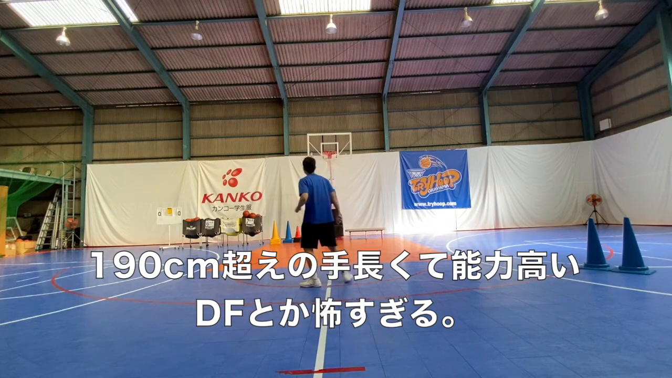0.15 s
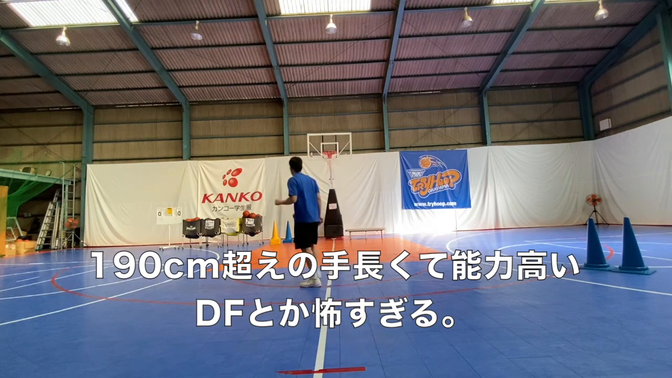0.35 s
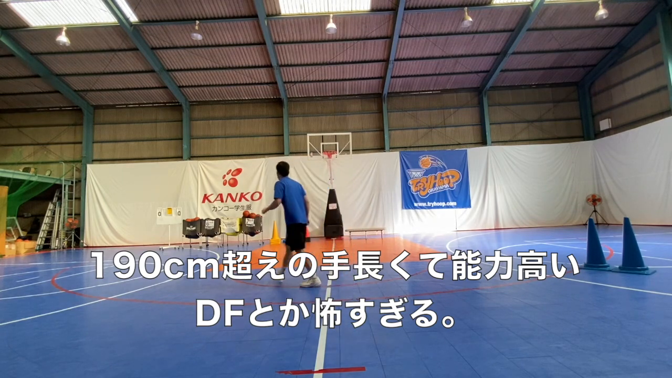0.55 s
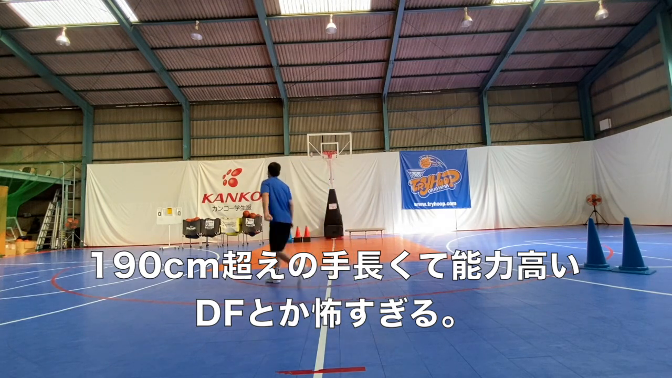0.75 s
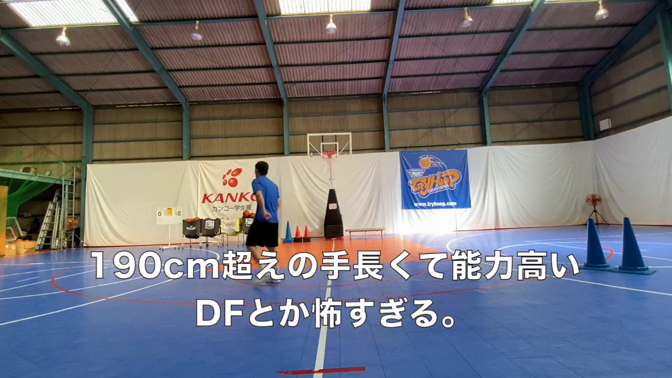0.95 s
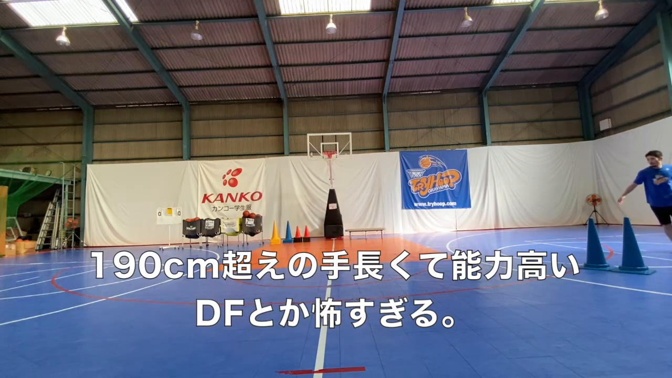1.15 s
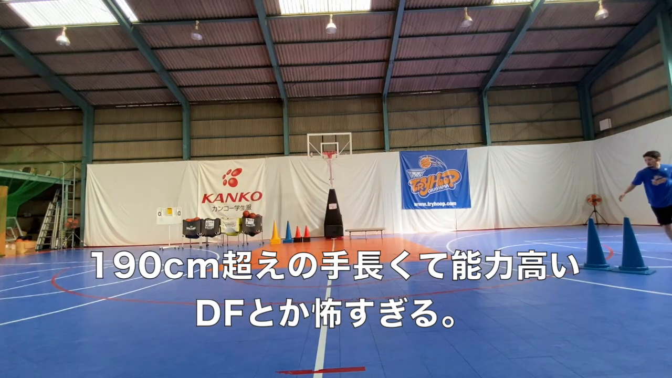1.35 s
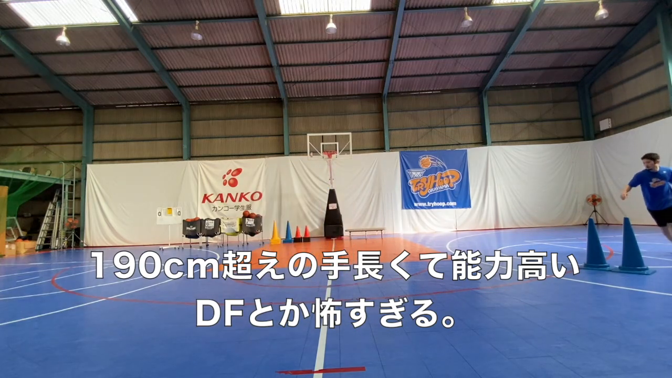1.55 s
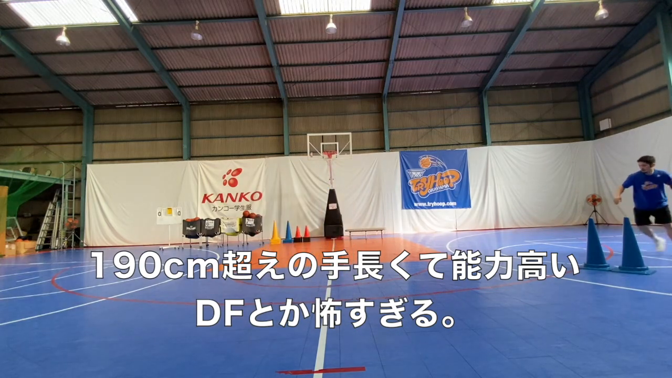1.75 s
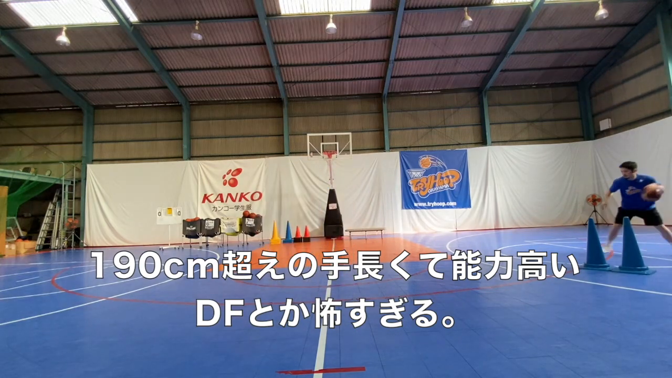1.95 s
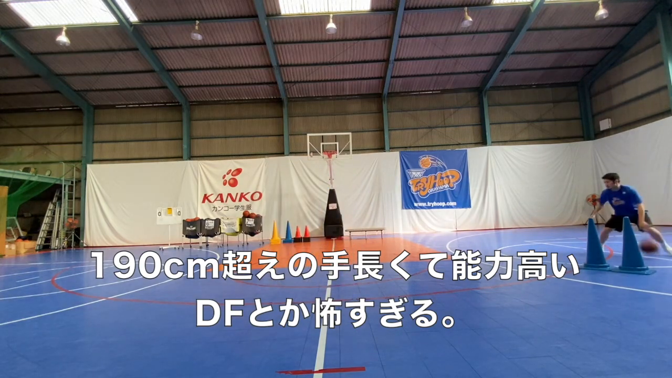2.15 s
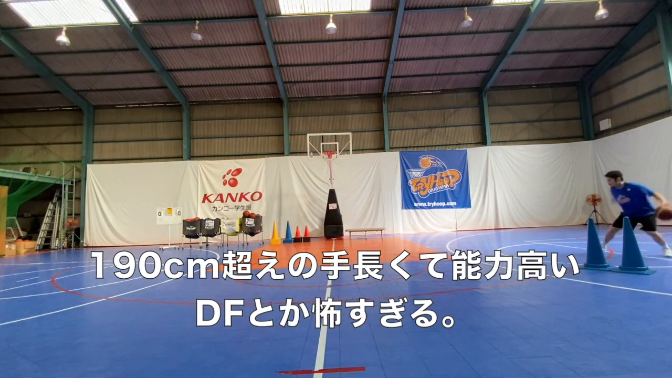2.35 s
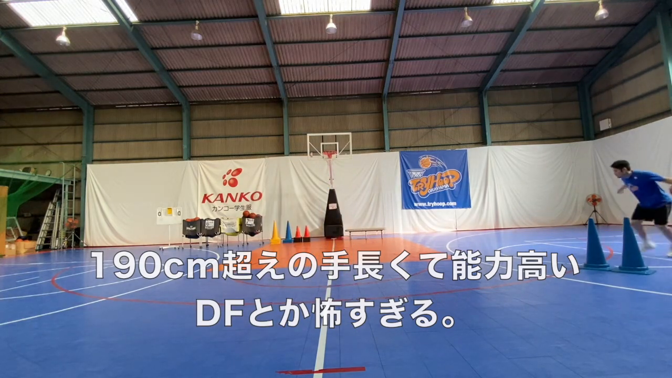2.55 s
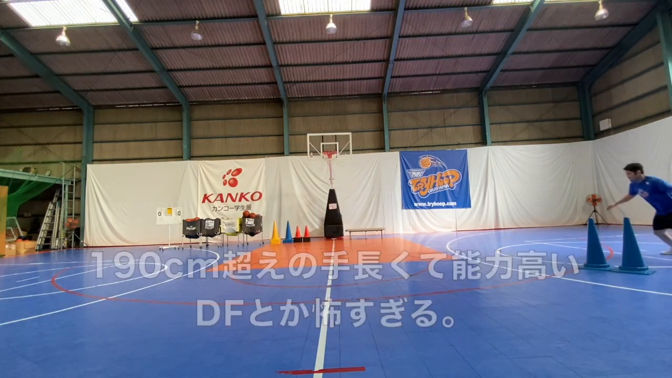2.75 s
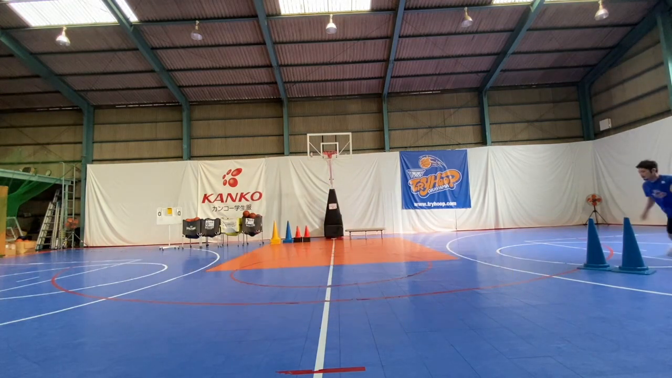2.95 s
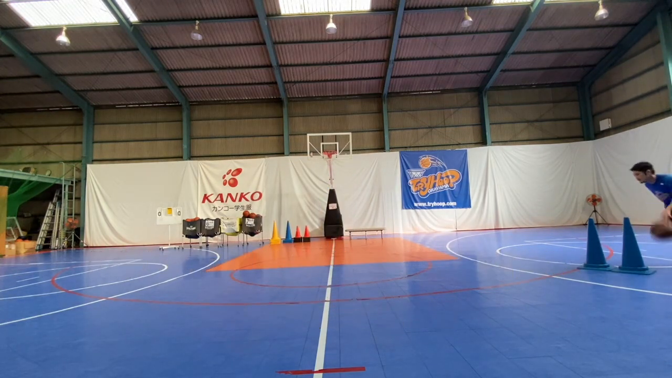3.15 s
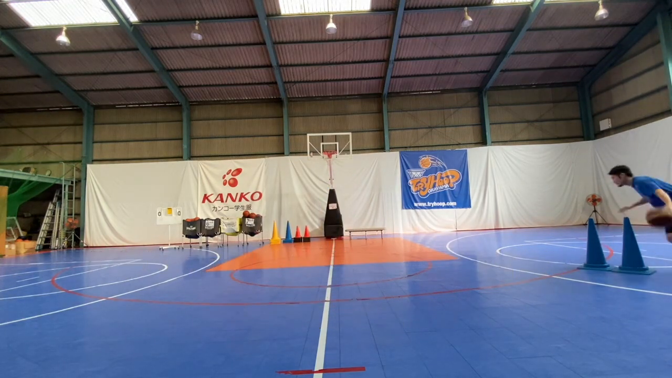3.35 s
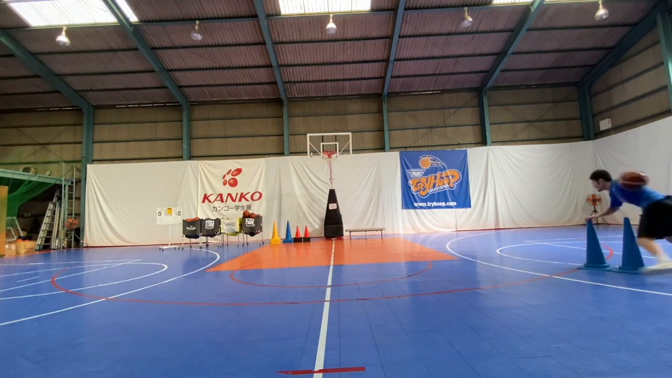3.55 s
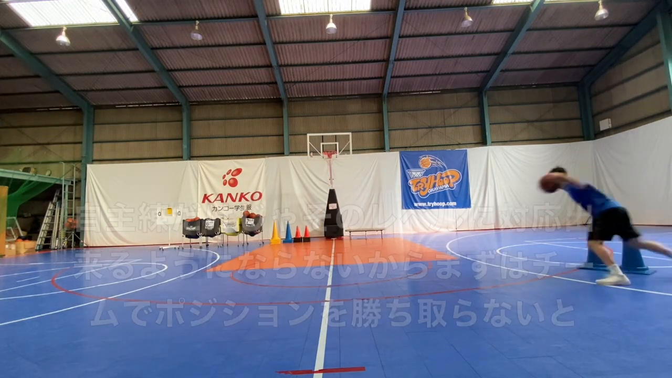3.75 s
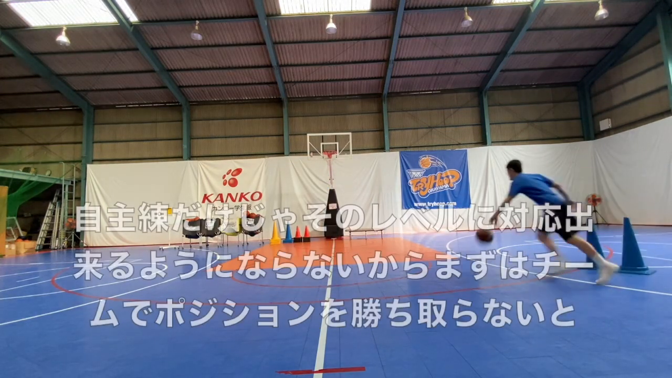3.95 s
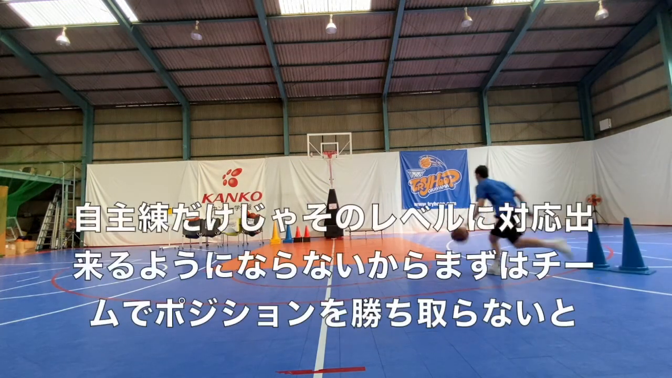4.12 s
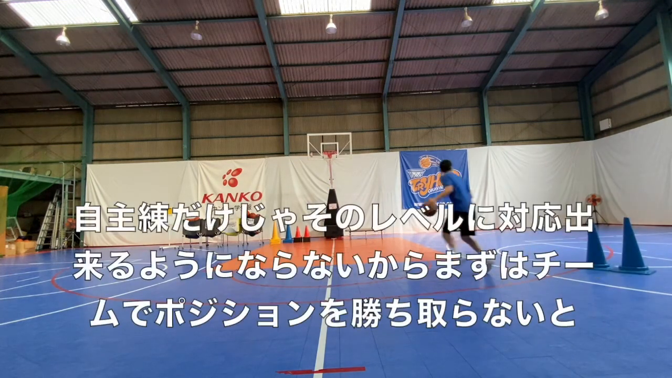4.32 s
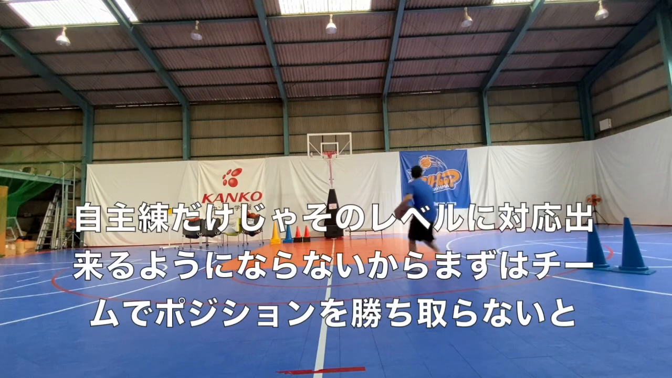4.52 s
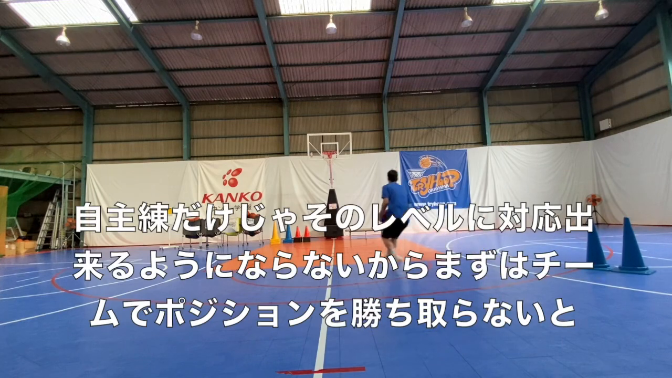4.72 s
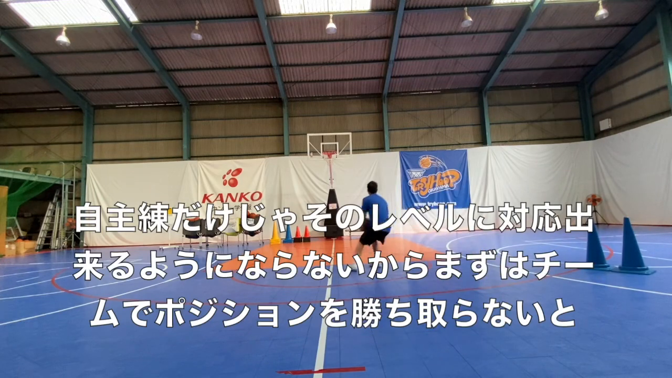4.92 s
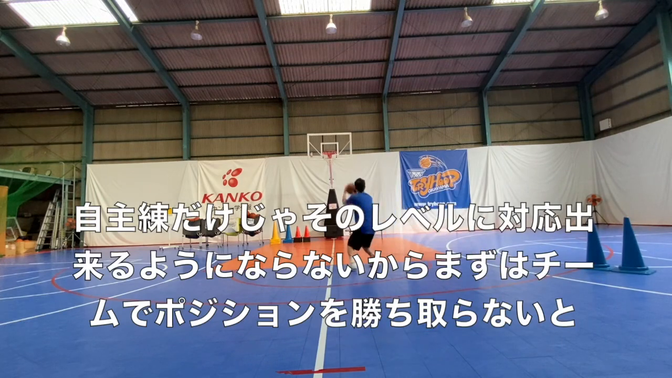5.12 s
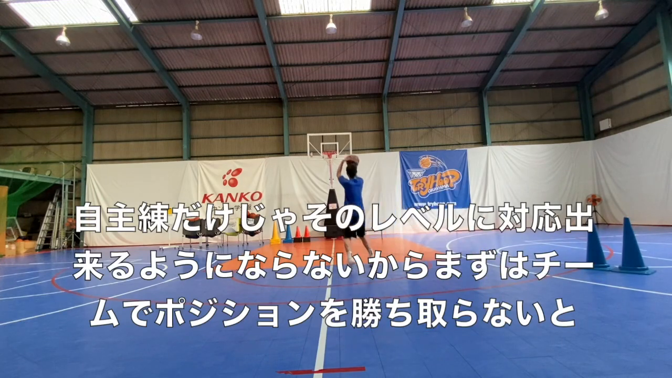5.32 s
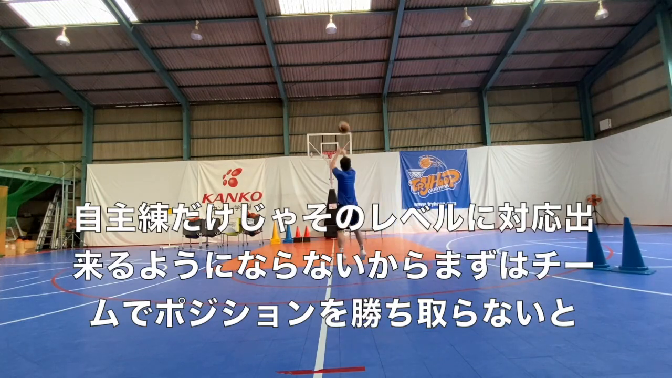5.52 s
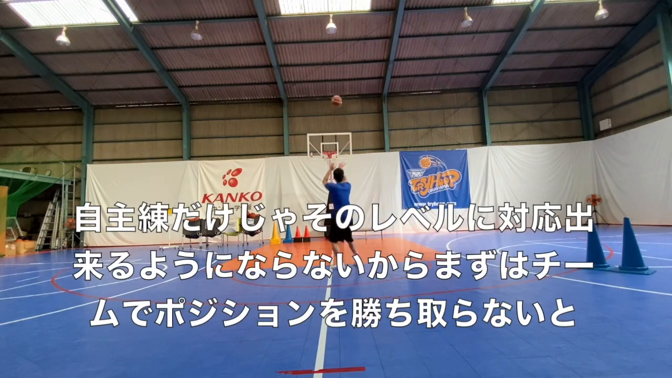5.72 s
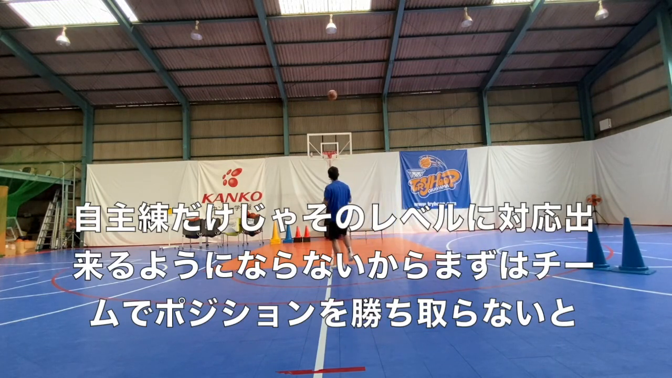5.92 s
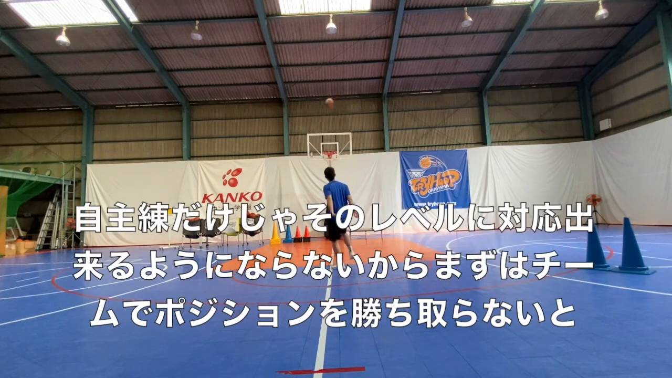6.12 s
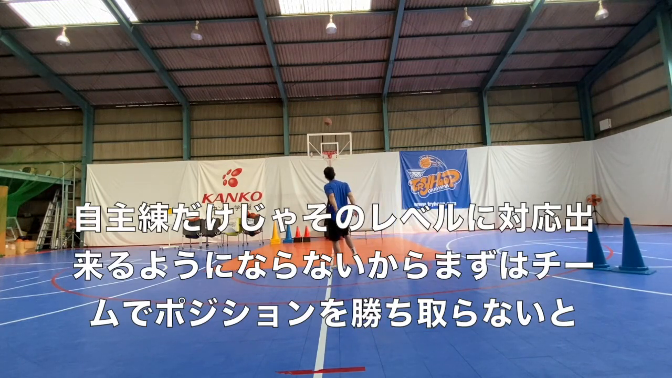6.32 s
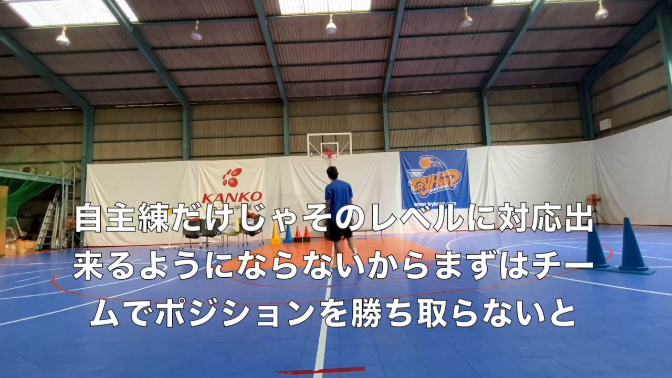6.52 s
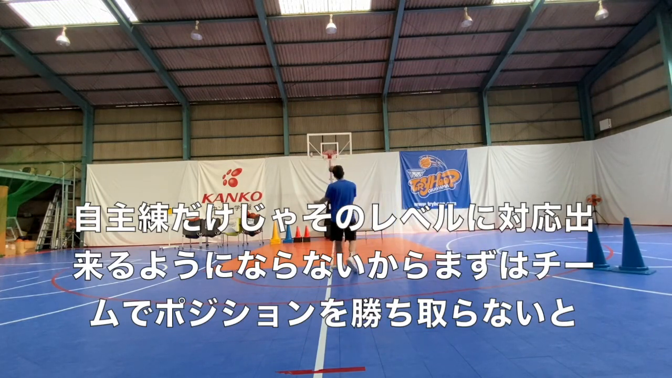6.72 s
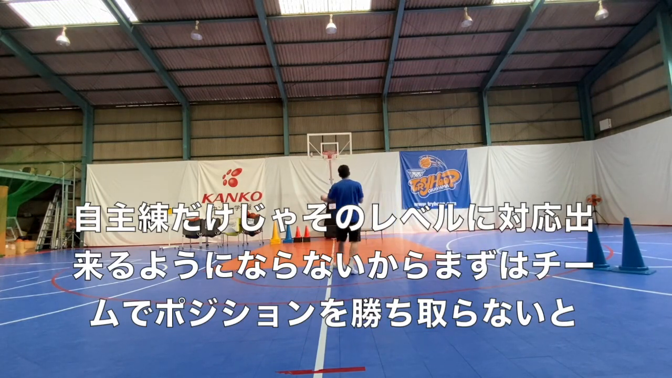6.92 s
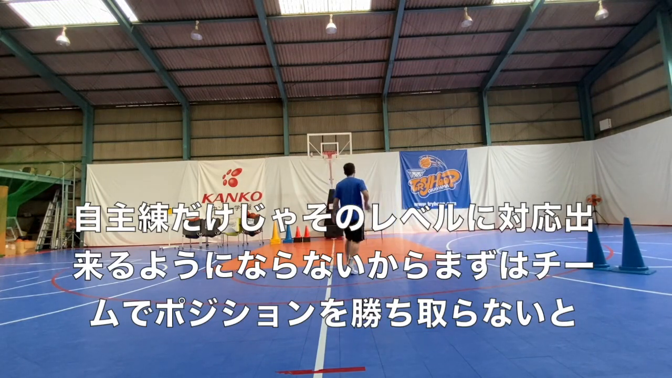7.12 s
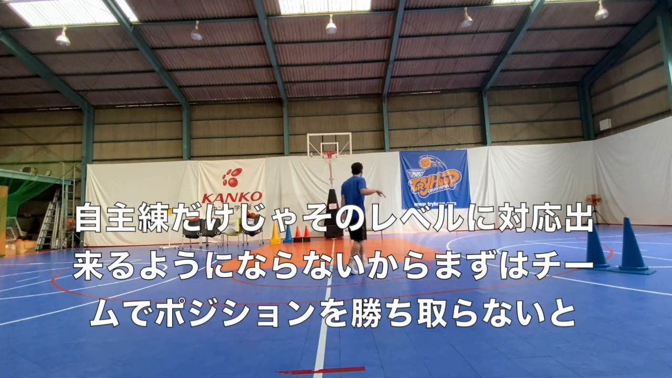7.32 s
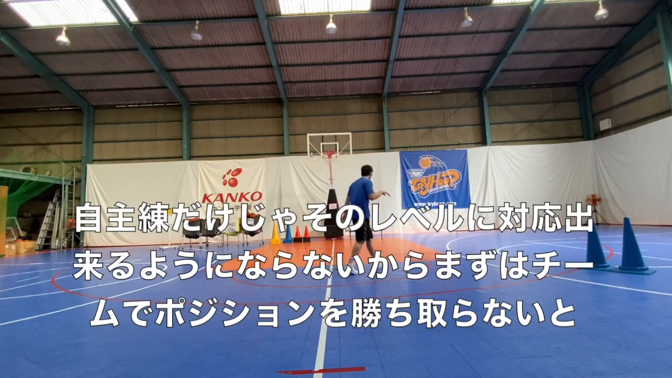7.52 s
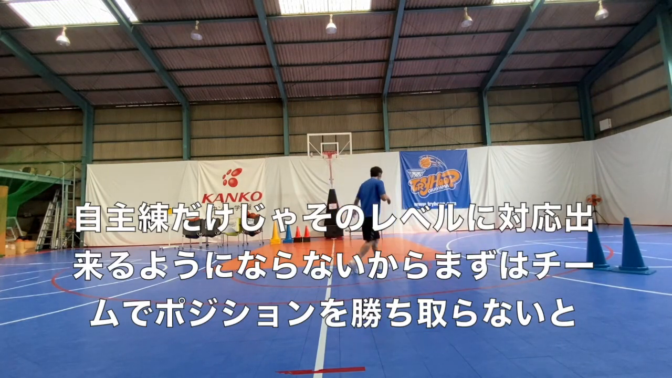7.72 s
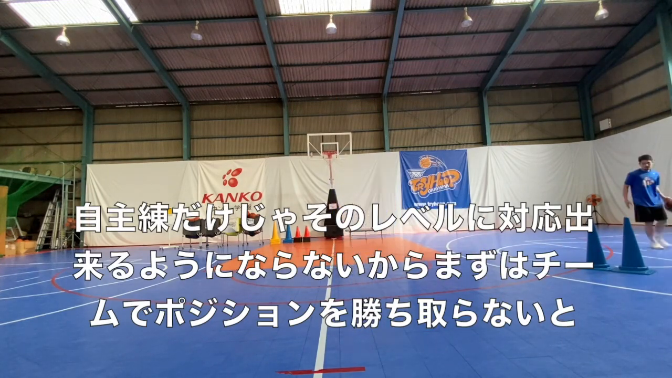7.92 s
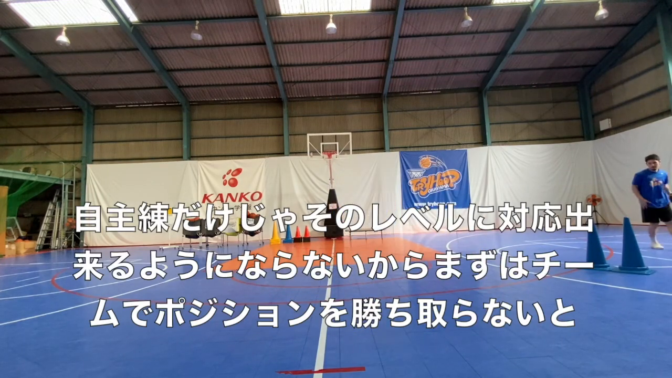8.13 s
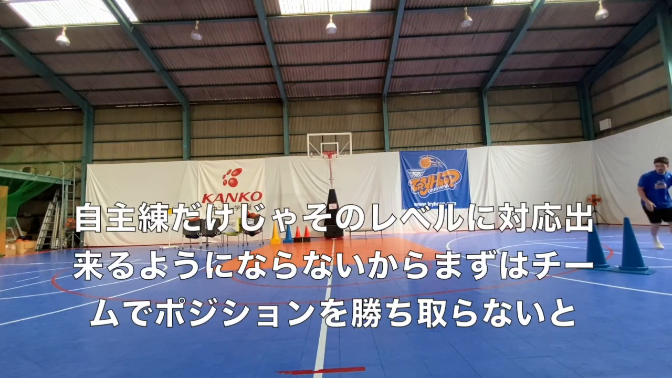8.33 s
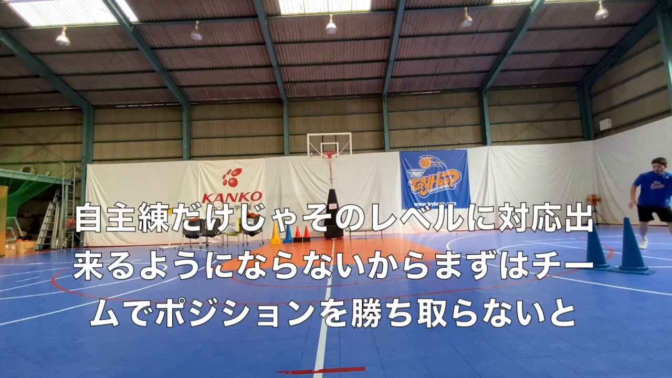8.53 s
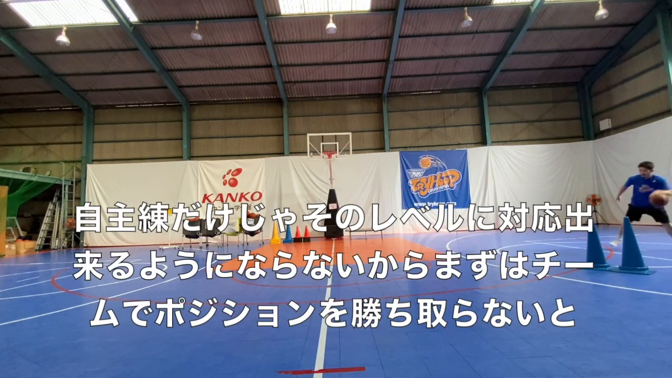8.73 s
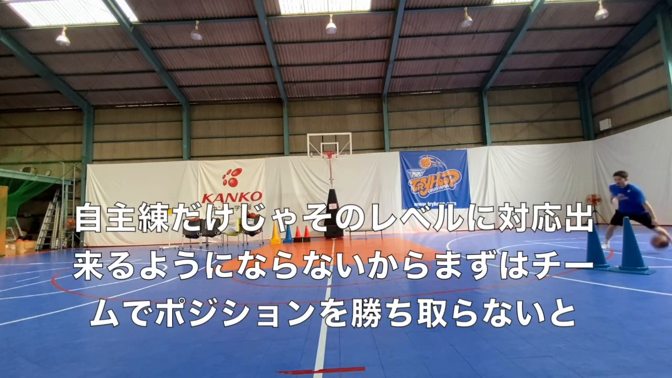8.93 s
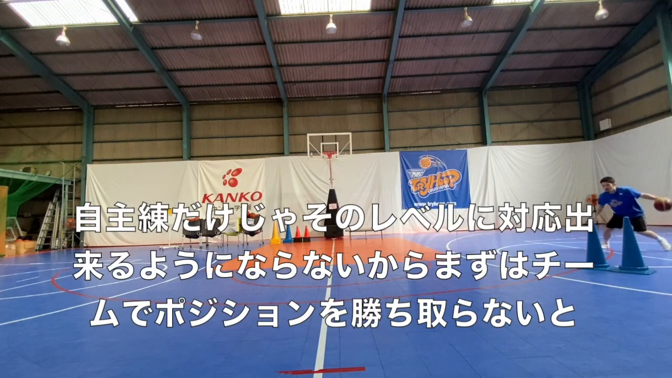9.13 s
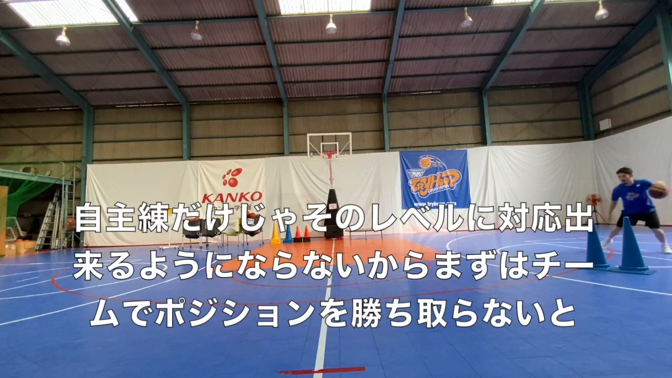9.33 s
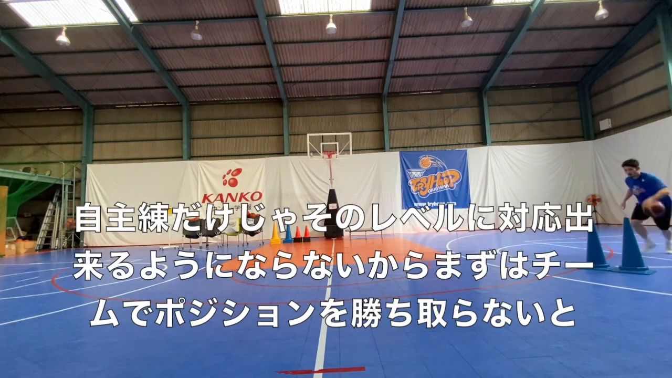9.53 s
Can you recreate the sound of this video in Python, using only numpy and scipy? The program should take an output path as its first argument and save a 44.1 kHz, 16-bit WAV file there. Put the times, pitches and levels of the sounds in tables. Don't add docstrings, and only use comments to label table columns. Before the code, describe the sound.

Widely spaced basketball bounces crack and thump on a hollow court, each doubled by a close wall echo and followed by a long hall tail. Between them come sole thuds, short scrapes, high rubbery chirps and a dragging squeak before the drive. After a loud chirp near five seconds things calm, a faint net swish follows, then two softer bounces. Low ventilation rumble throughout; the stereo microphone hears the player shift sideways and back to centre.

```python
import sys
import numpy as np
from scipy import signal
from scipy.io import wavfile
from scipy.ndimage import uniform_filter1d

SR = 44100
rng = np.random.default_rng(int(sys.argv[2]) if len(sys.argv) > 2 else 0)


def volts_from_db(level):
    exponent = np.asarray(level, float) / 20
    return 10 ** exponent


def dump_mix(stems):
    frames = np.atleast_2d(stems).T
    limited = np.clip(frames, -1, 1)
    pcm = np.round(limited * 32767).astype(np.int16)
    wavfile.write(sys.argv[1], SR, pcm)


N = 426447
LEAD, TAIL = SR, 2 * SR

SCENE_CHANGES = [
    1.014,
    7.960,
]
# (time [s], left port lag [samples], left minus right level of squeaks [dB])
PLAYER_PLACE = [(.2, 3, 0), (.99, 3.5, 0), (1.02, 12.6, 1), (2.3, 12.6, 1.5), (4.05, 10.8, 1),
                (4.45, 1.5, 1), (4.9, .5, 0), (5.5, 1, 0), (7.1, 3, 0), (7.9, 2.5, 0), (7.97, 10.7, 0)]

# (frequency [Hz], level [dB])
FAN_COLOUR = [(25, -18.5), (50, -5), (68, -3), (75, 8), (82, -12), (112, -4), (140, -20), (400, -28),
              (1200, -55), (3000, -62.5), (7000, -71), (16000, -92)]
# (time [s], level [dB])
FAN_LEVEL = [(0, -42.5), (1, -44), (2, -45.5), (3.5, -43), (4.901, -40.5), (5, -51), (5.701, -47.5),
             (6.5, -48.5), (7.9, -43), (8.699, -49.5), (9.67, -47)]

# (frequency [Hz], t60 [s])
HALL_T60 = [(50, 1.24), (160, 1.42), (420, 1.154), (1100, 2.206), (2900, 2.765), (5000, 2.28), (8000, 1.33),
            (14000, 0.81)]
# (frequency [Hz], level [dB])
HALL_COLOUR = [(30, -15.5), (80, -2.5), (200, -0.5), (450, -1.5), (1000, -2), (2500, -2.5), (5000, -4.5),
               (9000, -3.5), (12500, -1), (16000, -27.5)]
# (frequency [Hz], level [dB])
FLAT = [(20, 0), (20000, 0)]
# (delay [s], level [dB])
FAR_ECHOES = [(.028, -7), (.063, -11), (.082, -10), (.115, -15)]
WALL_S, WALL_DB, WALL_HZ = .0087, -1.5, 7310

# (loudest time [s], level [dB], rise [s], fall [s])
NET = (6.635, -42, .06, .11)
# (frequency [Hz], level [dB])
NET_COLOUR = [(100, -21), (400, -13), (900, 0.5), (1700, -13.5), (3000, -14.5), (5500, -21), (9000, -35),
              (16000, -43)]
# (loudest time [s], level [dB], rise [s], fall [s])
RUSTLES = [
    (3.74, -48, .1, .3),
    (6.51, -73, 0.045, .1),
    (9.58, -56.5, .25, 0.23),
]
# (frequency [Hz], level [dB])
RUSTLE_COLOUR = [(300, 12), (2000, 4), (6000, -5), (9000, -3), (12000, -19), (16000, -40)]

# (time [s], level [dB], thud [Hz], sole click [dB],
# hall [dB])
FOOTFALLS = [(0.059, -36, 463, -27, -23), (1.579, -39.5, 242, -32, -19.5), (1.701, -59, 219, -20, -31),
             (2.018, -36, 172, -17, -14), (2.692, -33.5, 530, -28, -16.5), (2.959, -33.5, 199, -18.5, -21),
             (3.45, -25, 280, -34, -20), (3.562, -20, 135, -45, -24), (3.655, -58, 200, 4, -22),
             (3.724, -58, 200, 2, -24), (3.913, -56, 148.6, 3, -30), (4.454, -24.5, 336, -26.5, -17),
             (4.918, -30.5, 191, -26, -17.5), (5.613, -25.5, 420, -30, -19.5), (5.635, -29, 467, -20, -22),
             (6.575, -56, 900, -2, -18), (6.618, -35.5, 880, -24, -13), (7.789, -43, 272, -14, -27),
             (8.855, -32.5, 166, -17, -21)]
# (frequency [Hz], level [dB])
FOOTFALL_COLOUR = [(60, -19), (150, 0.5), (400, -1), (900, -4), (2000, -20), (5000, -24), (10000, -35),
                   (16000, -54)]

# (time [s], length [s], first slip rate [Hz], level [dB], hall [dB])
CHIRPS = [
    (4.9232, 0.0045, 3300, -27, -20),
    (4.9272, 0.0098, 3450, -11.5, -18.5),
]
# (time [s], length [s], first slip rate [Hz], level [dB], hall [dB])
TWISTS = [
    (2.036, .008, 3780, -53, -9),
    (2.098, .006, 3720, -48, -9),
    (2.69, 0.012, 3480, -36.5, -10),
    (4.454, 0.0038, 3200, -35, -21),
    (4.4578, 0.0044, 3800, -30, -20),
    (4.463, 0.0044, 3350, -24, -19.5),
    (4.4672, 0.0058, 3700, -28, -18),
]
# (time [s], length [s], first slip rate [Hz], level [dB], hall [dB])
SLIDES = [
    (1.014, 0.013, 3800, -48, -0.5),
    (2.7215, 0.015, 3480, -32, -12.5),
    (2.740, .012, 3300, -35, -12),
    (2.756, 0.022, 3600, -35, -12),
    (2.772, 0.03, 3340, -35, -13),
    (2.80, .03, 3620, -35, -13),
]
# (time [s], length [s], first slip rate [Hz], level [dB], hall [dB])
SKIDS = [
    (1.016, .016, 3520, -41, -3.5),
    (2.35, 0.032, 3170, -57, -3),
    (3.223, 0.024, 3200, -22, -18.5),
    (3.425, .03, 3090, -36, -16),
    (3.456, .026, 2975, -27, -14),
]
# (time [s], length [s], first slip rate [Hz], level [dB], hall [dB])
SCRAPES = [
    (2.0185, 0.007, 4280, -39, -12),
    (2.0625, .008, 4280, -42, -13),
    (2.0875, .007, 4240, -36, -11),
]
# (roughness [0-1], rate lost by the end [0-1], second partial at start [dB], at end [dB],
# third partial [dB], scuff [dB])
CHIRP_GRIP, TWIST_GRIP = (.13, .04, -17, -7, -16, -32), (.3, .08, -5, 4, -17, -16)
SLIDE_GRIP, SKID_GRIP = (.42, .03, -26, -19, -34, -19), (.22, .03, -7, 1, -17, -15)
# [0-1, 0-1, dB, dB, dB, dB]
SCRAPE_GRIP = (.3, .04, -12, -8, -28, -13)
SCUFF_HZ = [4500, 10500]

# (time [s], slap [dB], floor boom [Hz], boom [dB], hall [dB])
BOUNCES = [
    (0.203, -11, 109, -13.5, -21.5),
    (2.21, -9.5, 106, -13.5, -25.5),
    (3.227, -6, 127, -9.5, -22),
    (4.028, -2.5, 109, -12.5, -22),
    (7.1938, -10, 117.4, -14.5, -20.5),
    (8.9228, -11, 103, -16, -23),
]
# (frequency [Hz], level [dB], t60 [s])
BALL_MODES = [(307, -4.5, 0.021), (578, -5.5, 0.014), (908, -2.5, 0.018), (1310, 1.5, 0.0061),
              (2040, -5.5, .008), (2760, -11, 0.0058)]
# (frequency [Hz], level [dB])
BALL_COLOUR = [(18, -48.5), (30, -4), (86, 0), (364, -16), (600, -16), (666, -15), (1250, -16.5),
               (1860, -22), (2540, -24), (3400, -29.5), (7470, -31), (11700, -43), (13300, -73),
               (14800, -50.5), (16000, -65)]
UNSEEN_S = [
    -.9,
    .975,
    7.84,
]
# (tail [dB], bass [dB])
UNSEEN_LEVELS = [
    (-26.5, -4),
    (-27.5, -7),
    (-27, -6),
]


def curve(table, hz):
    f, v = np.transpose(table)
    return np.interp(np.log(hz + 1), np.log(f), v)


def wander(size, count):
    x = uniform_filter1d(rng.standard_normal(size), size=count)
    return x / x.std()


def ring(hz, t60, size=SR // 4):
    t = np.arange(size) / SR
    return np.sin(2 * np.pi * hz * t) * np.exp(-np.log(1000) * t / max(t60, 1e-3))


def diffuse(size, db_of, lag=0., order=1024):
    hop = order // 2
    hz = np.arange(hop + 1)[:, None] * SR / order
    t = np.arange(size // hop + 2) * hop / SR
    mid, side = rng.standard_normal((2, len(hz), 2 * len(t))).view(complex) * volts_from_db(db_of(hz, t))
    side = side * .8 * np.minimum(hz / 520, 1)
    turn = np.exp(1j * np.pi * hz * lag / SR)
    ports = np.array([(mid + side) / turn, (mid - side) * turn])
    return signal.istft(ports, window="cosine", nperseg=order)[1][:, :size]


def fan_rumble():
    fans = diffuse(N, lambda hz, t: curve(FAN_COLOUR, hz), order=8192)
    return fans / fans.std() * volts_from_db(np.interp(np.arange(N) / SR, *np.transpose(FAN_LEVEL)))


def hall_tail(lag, hall_db, colour, bass_db, size):
    ripple = 2.0 * wander(513, count=3)[:, None]

    def level(hz, t):
        shape = curve(HALL_COLOUR, hz) + curve(colour, hz) + ripple + bass_db / (1 + (hz / 170) ** 4)
        return shape - 60 * t / curve(HALL_T60, hz)

    tail = diffuse(size, level, lag)
    t = np.arange(size) / SR
    first_db = np.exp(-t / .19)
    lumps_db = 2.8 * wander(size, count=90) * np.exp(-t / .1)
    tail *= volts_from_db(hall_db - 46 + first_db + lumps_db)
    return tail * (1 - np.exp(-(t / .021) ** 2))


def early_paths(lag):
    n = np.arange(6144)
    delays = np.array([[max(lag, 0)], [max(-lag, 0)]]) + 8
    echo = np.sinc(n - delays[::-1] - WALL_S * SR) * volts_from_db(WALL_DB)
    grit = rng.standard_normal((1, 64)) * np.exp(-np.abs(np.arange(-24, 40)) / 12) * .1
    rough_wall = (np.arange(64) == 24) + grit
    rough_echo = signal.fftconvolve(echo, rough_wall, axes=1)[:, 24:len(n) + 24]
    bright = signal.lfilter(*signal.iirpeak(WALL_HZ, 1.2, SR), rough_echo)
    scatter = volts_from_db(-19) * rng.standard_normal((2, len(n))) * np.exp(-n / SR / .011) * (n > 30)
    near = np.sinc(n - delays) + .99 * echo + bright + .62 * scatter
    grain = volts_from_db(-30) * rng.standard_normal((2, len(n)))
    far = 0
    for s, db in FAR_ECHOES:
        smear = grain * np.exp(-np.abs(n / SR - s) / .003)
        far = far + volts_from_db(db) * (np.sinc(n - s * SR) + smear)
    return near + signal.lfilter(*signal.butter(2, 1400, fs=SR), far)


def heard(x, lag, hall_db, pan_db=0., colour=None, bass_db=0., fed=None, size=TAIL):
    tail = hall_tail(lag, hall_db, colour or FLAT, bass_db, size)
    pan = volts_from_db(np.array([[pan_db], [-pan_db]]) / 2)
    near = signal.fftconvolve(early_paths(lag) * pan, x[None], axes=1)
    far = tail if colour else signal.fftconvolve(tail, (x if fed is None else fed)[None], axes=1)
    return far + np.pad(near, ((0, 0), (0, far.shape[1] - near.shape[1])))


def swish(db, rise, fall, colour):
    t = np.arange(-rise, fall, 1 / SR)[:SR // 2]
    grains = volts_from_db(5.0 * wander(SR // 2, count=130))
    x = diffuse(SR // 2, lambda hz, _: curve(colour, hz))[0] * grains
    swell_db = np.where(t < 0, -30 * (t / rise) ** 2, -24.5 * t / fall)
    return x[:len(t)] / x.std() * volts_from_db(db + swell_db)


def footfall(db, hz, click_db):
    t = np.arange(SR // 4) / SR
    tick = rng.standard_normal(len(t)) * np.exp(-t / .0005)
    thud = ring(hz, .018) + .5 * ring(2.23 * hz, .02) + .3 * ring(5.2 * hz, .013) + .21 * ring(83, .075)
    crunch = signal.lfilter(*signal.butter(2, 2200, fs=SR), rng.standard_normal(len(t)))
    thud += volts_from_db(-6) * crunch * np.exp(-t / .008)
    return volts_from_db(db) * np.pad(thud + volts_from_db(click_db + 9) * tick, (40, 0))


def squeak(length, hz, db, grip_kind):
    rough, sag, second_db, late_db, third_db, scuff_db = grip_kind
    u = np.arange(0, length, 1 / SR) / length
    grip = uniform_filter1d(rng.standard_normal((2, SR // 8)), size=60)
    grip = uniform_filter1d(grip, size=60)[:, :len(u)] * 9
    jitter = 1 + .08 * rough * (grip[0] - grip[0].mean())
    phase = 2 * np.pi * np.cumsum(hz * (1 - sag * u ** 1.54) * jitter) / SR
    partials_db = (0, second_db + (late_db - second_db) * u, third_db, third_db - 24)
    tone = sum(volts_from_db(p) * np.sin((k + 1) * phase) for k, p in enumerate(partials_db))
    scuff = signal.lfilter(*signal.butter(1, SCUFF_HZ, "band", fs=SR), rng.standard_normal(SR // 8))
    tone += volts_from_db(scuff_db) * scuff[:len(u)]
    level = volts_from_db(db - 4.5 * u + 7 * rough * grip[1])
    return np.sqrt(2) * tone * level * signal.windows.tukey(len(u), .42)


def squeak_moves():
    kinds = ((CHIRPS, CHIRP_GRIP), (TWISTS, TWIST_GRIP), (SLIDES, SLIDE_GRIP),
             (SKIDS, SKID_GRIP), (SCRAPES, SCRAPE_GRIP))
    rows = sorted(tuple(row) + (grip,) for table, grip in kinds for row in table)
    while rows:
        start, x = rows[0][0], np.zeros((2, SR // 5))
        while rows and rows[0][0] < start + .15:
            s, length, hz, db, hall_db, grip = rows.pop(0)
            one, i = squeak(length, hz, db, grip), int((s - start) * SR)
            x[:, i:i + len(one)] += one * volts_from_db(np.array([[0], [hall_db]]))
        yield start, x[0], x[1]


def ball_bounce(slap_db, boom_hz, boom_db):
    t = np.arange(SR // 4) / SR - .0007
    crack = 1.3 * np.exp(-(t / .00003) ** 2) + .3 * rng.standard_normal(len(t))
    crack *= np.exp(-np.abs(t) / .0003)
    air = 0
    for k, (hz, db, t60) in enumerate(BALL_MODES):
        detune = 1 + .04 * rng.standard_normal()
        air = air + volts_from_db(db) * ring(hz * detune, t60) * (-1) ** k
    boom = 2.5 * np.sin(2 * np.pi * boom_hz * (t - .0148))
    boom *= np.exp(-t / .0083) * (1 - np.exp(-(t / .0073) ** 2))
    return volts_from_db(slap_db) * (crack + .58 * np.roll(air, 36)) + volts_from_db(boom_db) * boom


def add(track, s, x):
    i = int(round(s * SR)) + LEAD
    track[:, i:i + x.shape[1]] += x


def scene():
    stretches = np.zeros((len(SCENE_CHANGES) + 1, 2, LEAD + N + 2 * TAIL))
    when, lags, pans_db = np.transpose(PLAYER_PLACE)

    def stretch(s):
        return stretches[np.searchsorted(SCENE_CHANGES, s + 1e-3)]

    def lag(s):
        return np.interp(s, when, lags)

    swishes = [(NET, NET_COLOUR, 0)] + [(row, RUSTLE_COLOUR, 7.3) for row in RUSTLES]
    for (s, db, rise, fall), colour, side in swishes:
        add(stretch(s), s - rise, heard(swish(db, rise, fall, colour), side, -13.0))
    for s, db, hz, click_db, hall_db in FOOTFALLS:
        x = footfall(db, hz, click_db)
        add(stretch(s), s, heard(x, lag(s), db + hall_db + 39.5, colour=FOOTFALL_COLOUR, size=TAIL // 2))
    for s, squeaks, fed in squeak_moves():
        add(stretch(s), s, heard(squeaks, lag(s), 0, np.interp(s, when, pans_db), fed=fed))
    for k, (s, (db, bass_db)) in enumerate(zip(UNSEEN_S, UNSEEN_LEVELS)):
        add(stretches[k], s, heard(np.zeros(1), 12.1, db + 42.5, colour=BALL_COLOUR, bass_db=bass_db))
    for s, slap_db, hz, boom_db, hall_db in BOUNCES:
        x, bass_db = ball_bounce(slap_db, hz, boom_db), .5 * (boom_db - hall_db) - 2.5
        add(stretch(s), s, heard(x, lag(s), hall_db + 41, colour=BALL_COLOUR, bass_db=bass_db))
    which = np.searchsorted(SCENE_CHANGES, np.arange(N) / SR)
    court = np.zeros((2, N))
    for k, x in enumerate(stretches):
        court += x[:, LEAD:LEAD + N] * uniform_filter1d(1. * (which == k), size=350)
    return court + fan_rumble()


def roll_off(x):
    return signal.sosfilt(signal.butter(12, 16400, fs=SR, output="sos"), x)


def record(dry):
    x = dry * volts_from_db(np.array([[1.6], [-1.6]]) / 2)
    x = x + .2 * np.array([[1], [-1]]) * signal.lfilter(*signal.iirpeak(6200, 2, SR), x)
    x = signal.sosfilt(signal.butter(2, 45, "high", fs=SR, output="sos"), x)
    x = signal.sosfilt(signal.butter(2, 12500, fs=SR, output="sos"), x)
    rounded = np.tanh(1.14 * x) / .96
    x = signal.sosfilt(signal.ellip(8, .2, 60, 16300, fs=SR, output="sos"), rounded)
    return roll_off(x)


dry = scene()
out = record(dry)
dump_mix(out)
```